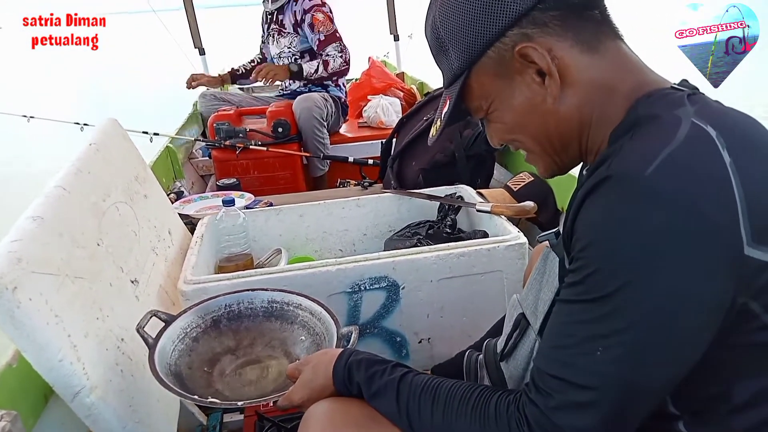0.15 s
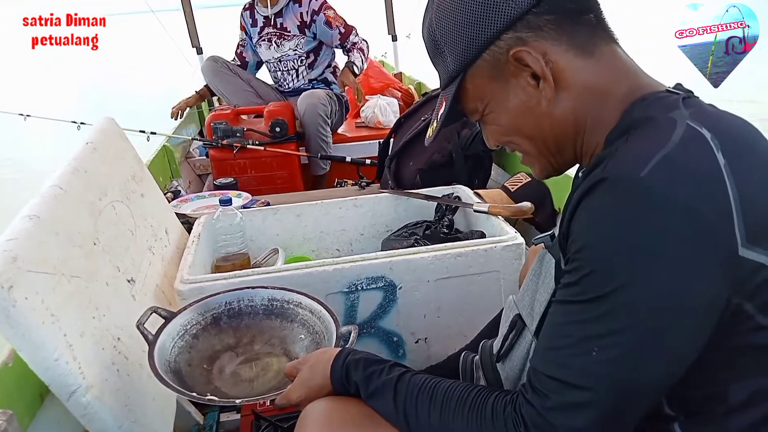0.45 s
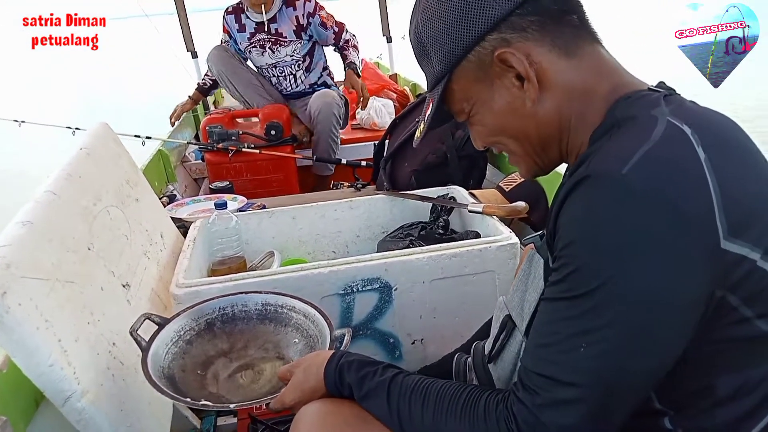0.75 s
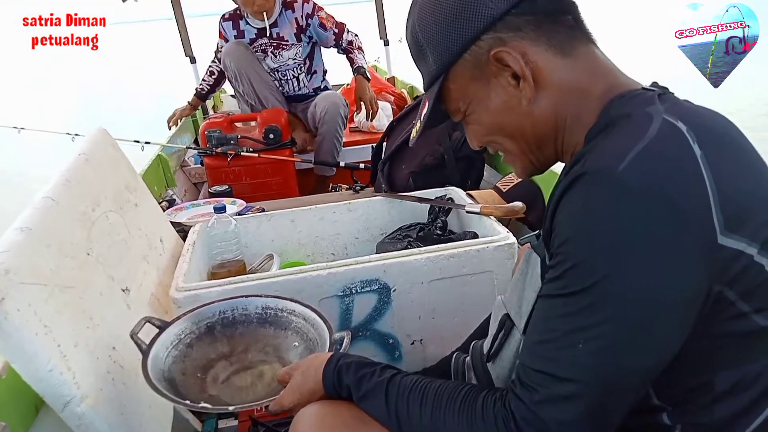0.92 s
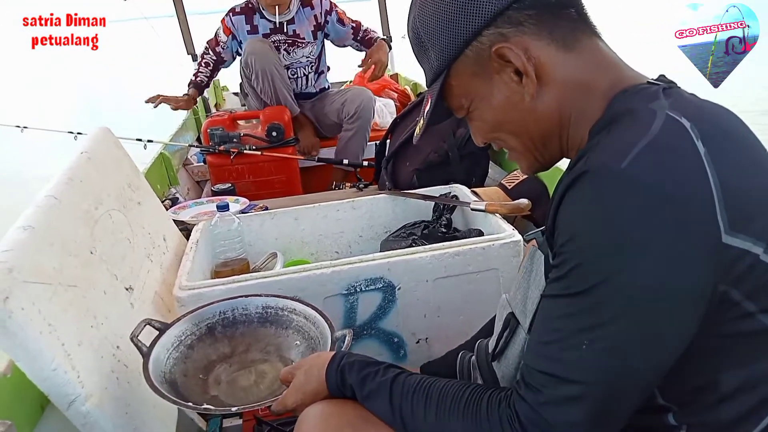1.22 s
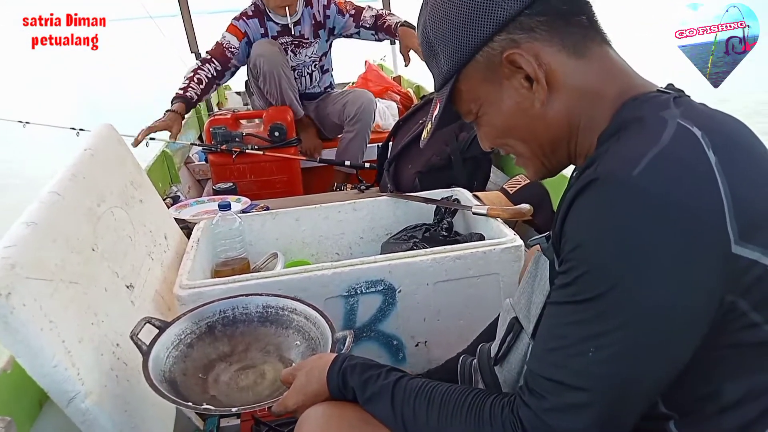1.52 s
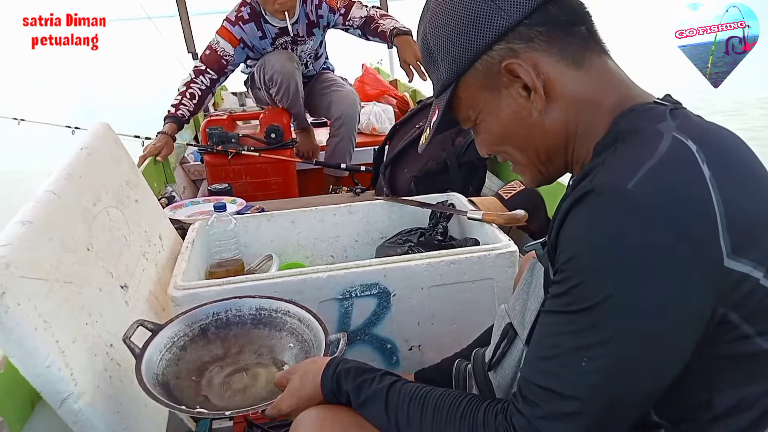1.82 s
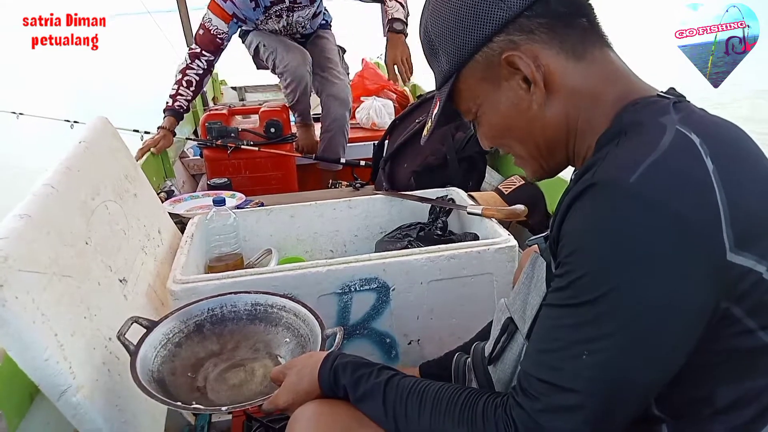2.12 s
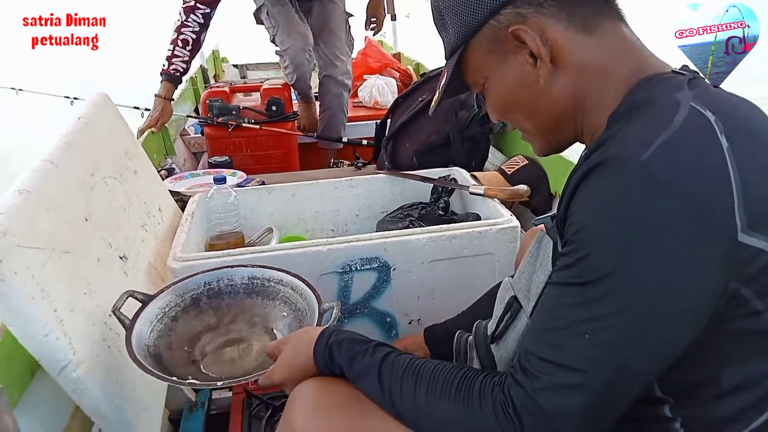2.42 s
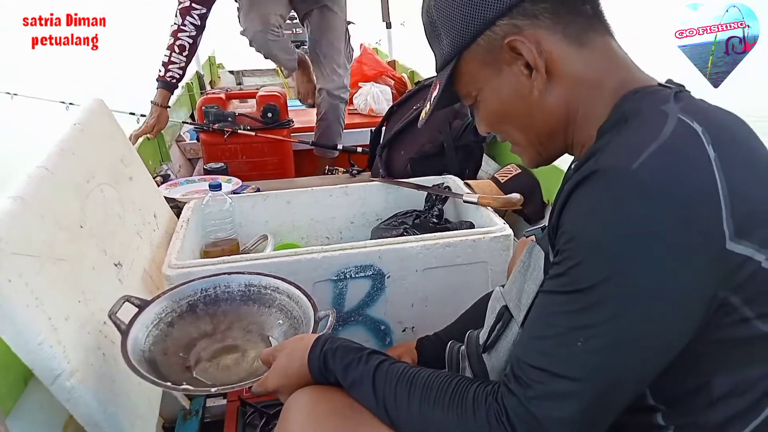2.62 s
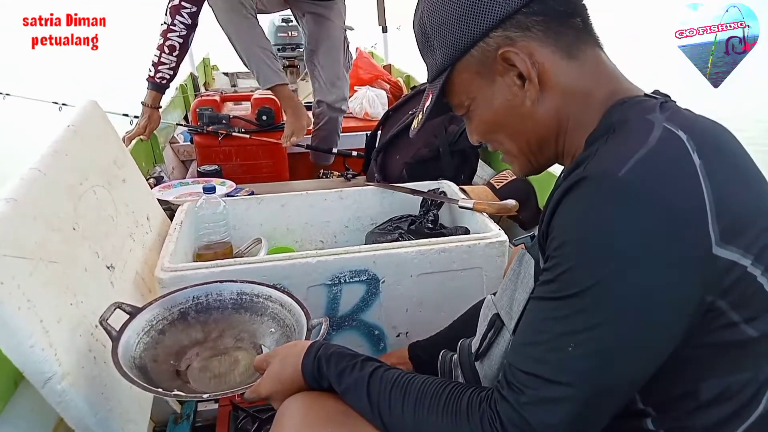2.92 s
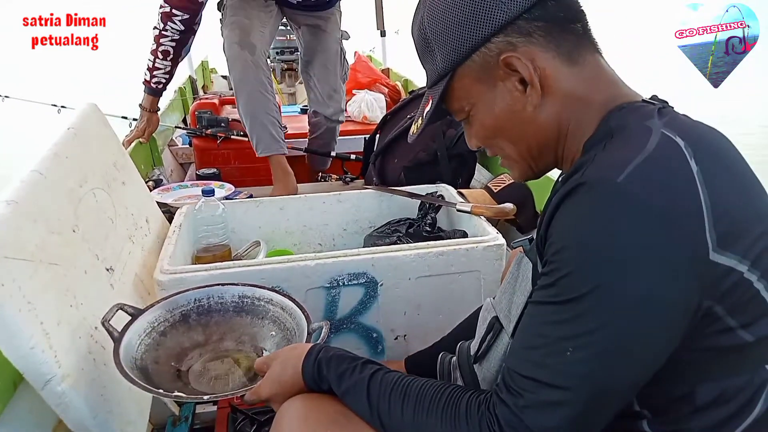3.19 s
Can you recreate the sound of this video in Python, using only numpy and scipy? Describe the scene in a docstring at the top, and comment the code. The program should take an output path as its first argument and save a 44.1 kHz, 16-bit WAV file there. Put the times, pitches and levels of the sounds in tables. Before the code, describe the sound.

Uneven metallic igniter snaps on a camping stove, a quiet gap, then a hard final clack.

```python
"""Sharp snaps of an igniter knob, cranked again and again on a camping gas stove aboard an open boat.
Each snap is a short rattle of sheet metal: enveloped noise plus tiny contacts that ring the stove body.
Decaying sine modes make the thin pan ring a little and the stove thump on the deck.
Behind them a single-cylinder engine putts slowly astern, as pulses through resonances, over sea hiss
of shaped noise and one puff of gas; a small camera microphone colours it all."""
import sys
import numpy as np
from scipy import signal
from scipy.fft import rfft, irfft
from scipy.io import wavfile
from scipy.ndimage import uniform_filter1d

SR = 44100
rng = np.random.default_rng(int(sys.argv[2]) if len(sys.argv) > 2 else 0)


def waveform_to_disk(signal):
    """Save audio, clipped to [-1, 1], as 16-bit WAV at the path in sys.argv[1]."""
    frames = np.transpose(np.atleast_2d(signal))
    scaled = np.clip(frames, -1, 1) * 32767
    samples = np.round(scaled).astype(np.int16)
    wavfile.write(sys.argv[1], SR, samples)


def natural_amplitude(level_db):
    """Convert a level in decibels to a linear amplitude factor, elementwise."""
    exponent = np.asarray(level_db, float) / 20
    return 10 ** exponent


N = 147735  # length [samples]


def unit(x):
    """Scale to rms 1."""
    return x / np.sqrt(np.mean(x ** 2))


def colour(x, table, lo_hz=1, hi_hz=30000):
    """Shape the spectrum of x by (frequency [Hz], level [dB]) points between two soft edges."""
    f = np.arange(N // 2 + 1) * SR / N + 1  # the 1 Hz offset keeps the logarithm finite
    hz, db = np.array(table, float).T
    edges = 1 / np.sqrt((1 + (lo_hz / f) ** 6) * (1 + (f / hi_hz) ** 6))
    gain = natural_amplitude(np.interp(np.log(f), np.log(hz), db))
    return irfft(rfft(x) * gain * edges, N)


def reson(x, hz, width_hz):
    """Two-pole resonance, gain 1 at the centre."""
    return signal.lfilter(*signal.iirpeak(hz, hz / width_hz, fs=SR), x)


def walk(rate):
    """Smooth random drift, rms near 1: levels held for 1 / rate seconds, then slewed twice."""
    k = int(SR / rate)
    held = np.repeat(rng.standard_normal(N // k + 1), k)
    return 1.3 * uniform_filter1d(uniform_filter1d(held, k), k)[:N]


def add(out, s, x):
    """Mix x into out from time s in seconds."""
    i = max(int(s * SR), 0)
    out[i:i + len(x)] += x[:N - i]


def fade(t, t60):
    """Exponential decay by 60 dB in t60 seconds, at least 5 ms."""
    return np.exp(-np.log(1000) * t / max(t60, .005))


def struck(blows, modes, octaves, push_s):
    """Every blow rings the same modes, most those near where it lands, each a little out of tune."""
    out, t = np.zeros(N), np.arange(SR // 2) / SR
    chances = rng.random((len(blows), len(modes), 2))
    for (s, db, near_hz), chance in zip(blows, chances):
        for (hz, mode_db, t60), (phase, tune) in zip(modes, chance):
            nearness = np.exp(-(np.log2(hz / near_hz) / octaves) ** 2)
            tuned_hz = hz * (1 + 0.014 * (tune - .5))
            ring = np.sin(2 * np.pi * tuned_hz * t + 2 * np.pi * phase)
            onset = 1 - np.exp(-t / push_s)
            add(out, s, natural_amplitude(db + mode_db) * nearness * onset * fade(t, t60) * ring)
    return out * natural_amplitude(1.5 * walk(90))  # the ringing wavers in level


# rattles of knob and stove body:
# (time [s], level [dB], low part [dB], treble part [dB], decay t60 of the middle part [s])
RATTLES = [(0.0014, -37.5, 7, -12.5, 0.077), (0.0419, -29.5, -7, -9, 0.14), (0.084, -35.5, -4.5, -12, 0.21),
           (0.0968, -22, 1, -1.5, 0.078), (0.123, -26, -19, -25, 0.19), (0.15, -28.5, 3.5, -19.5, 0.08),
           (0.304, -53, 2, -16, 0.11), (0.488, -36, 0.5, -31.5, 0.13), (0.5287, -41, -5, 1.5, 0.12),
           (0.544, -34.5, -1.5, -10.5, 0.18), (0.556, -30.5, -13, -11, 0.1),
           (0.7374, -49.5, 6.5, -24, 0.25), (0.7808, -37, 1.5, 9, 0.11), (0.9084, -46.5, 1.5, -11.5, 1),
           (0.9716, -20, -2.5, -11, 0.097), (0.977, -18.5, -14, -8.5, 0.099), (1.0918, -38, -4.5, -8, 0.25),
           (1.163, -34.5, 6, 8.5, 0.1), (1.19, -29, -2.5, -26, 0.16), (1.2124, -23, -3.5, -17, 0.14),
           (1.2185, -18.5, -6.5, -10.5, 0.1), (1.271, -36, -3.5, -16, 0.17),
           (1.321, -29.5, -6.5, -10, 0.045), (1.3595, -39, -3.5, -19, 0.086),
           (1.4482, -28.5, -2, -14.5, 0.13), (1.491, -40, 1, 1.5, 0.18), (1.498, -34, -2, -9, 0.18),
           (1.7378, -41, 5, 10.5, 0.12), (1.766, -30, -1.5, -17, 0.15), (1.797, -26.5, -1, -23, 0.16),
           (1.808, -20.5, -2.5, -6.5, 0.088), (1.8774, -50, -6, -31, 0.6), (2.036, -53, -9, -13, 0.72),
           (2.2975, -61, 15.5, -22, 0.091), (2.411, -58.5, 15.5, -29, 0.058), (2.5411, -62, 0, -1, 0.36),
           (2.596, -54, 5, -26.5, 0.22), (2.703, -64, -15, 3, 0.27), (3.025, -42, 3.5, -20, 0.15),
           (3.0303, -31, -7.5, -10, 0.16), (3.0383, -24, -13, -1, 0.12), (3.0485, -33, -8, -23, 0.19),
           (3.275, -42, 0.5, -16, 0.31), (3.3074, -49, 16, -24, 0.14), (3.3179, -5.5, -5.5, -7.5, 0.059),
           (3.3207, -21, 14.5, -26.5, 0.12)]
# tone of the rattle as the microphone hears it, with the microphone's peak near 15 kHz:
# (frequency [Hz], relative level [dB])
RATTLE_TONE = [(150, -9), (250, 10), (788, 1.5), (1280, -3.5), (3170, -11), (5350, -31), (7500, -12),
               (9490, -29.5), (13300, -33.5), (14800, -28)]
# short modes of the stove body: (frequency [Hz], width [Hz], level [dB])
STOVE_MODES = [(653, 39, -12.5), (1050, 190, -5), (1326, 50, -15.5), (1978, 43, -16.5), (2743, 23, -15.5),
               (3203, 170, -8.5), (3486, 140, -10.5)]
LOW_DB, MID_DB, TREBLE_DB = -9, -11, -7.5  # trim of the three parts
LOW_DECAY, TREBLE_DECAY = 1.326, 0.66  # relative to the middle
TAIL_DB, TAIL_T60_S = -30.5, 0.45  # faint tail of fixed decay under each rattle, slower than most
RISE_S, SOFTNESS = .0015, 0.67  # duller contacts rise more slowly
PART_EDGES_HZ = (300, 1500, 5000, 30000)
GRIT_DB, UNEVEN_DB, CONTACTS_PER_S = 2.5, 3.5, 1100


def rattle_power():
    """Power envelopes of the low, middle and treble parts, each with its own decay."""
    t, power = np.arange(SR // 2) / SR, np.zeros((3, N))
    for s, db, low_db, treble_db, t60 in RATTLES:
        rise_s = RISE_S * natural_amplitude(-SOFTNESS * treble_db)
        rise = 1 - np.exp(-t / rise_s)
        parts = ((low_db + LOW_DB, LOW_DECAY), (MID_DB, 1), (treble_db + TREBLE_DB, TREBLE_DECAY))
        for row, (part_db, share) in zip(power, parts):
            tail = natural_amplitude(TAIL_DB) * fade(t, TAIL_T60_S * share)
            shape = fade(t, t60 * share) ** 2 + tail ** 2
            add(row, s - rise_s, (natural_amplitude(db + part_db) * rise) ** 2 * shape)
    return power


def clacks():
    """Sheet metal rattles as gritty noise in three parts; tiny contacts ring the stove modes unevenly."""
    power, out = rattle_power(), np.zeros(N)
    grit = natural_amplitude(GRIT_DB * walk(500))
    for k, row in enumerate(power):
        noise = grit * rng.standard_normal(N)
        out += np.sqrt(row) * unit(colour(noise, RATTLE_TONE, PART_EDGES_HZ[k], PART_EDGES_HZ[k + 1]))
    for hz, width_hz, db in STOVE_MODES:
        contacts = unit((rng.random(N) < CONTACTS_PER_S / SR) * rng.standard_normal(N))
        part = np.searchsorted(PART_EDGES_HZ, hz) - 1
        ring = reson(np.sqrt(power[part]) * contacts, hz, width_hz)
        makeup = np.sqrt(SR / width_hz / np.pi)  # a narrow mode passes little of the contacts
        out += natural_amplitude(db + UNEVEN_DB * walk(18)) * makeup * ring
    return out


# knocks that reach the pan: (time [s], level [dB], frequency around which it is excited [Hz])
PAN_KNOCKS = [(0.099, -52, 1650), (.152, -62.5, 1770), (.781, -46, 3880), (.982, -42.5, 970),
              (1.222, -48, 1310), (1.502, -51, 3300), (1.743, -45.5, 4050), (1.805, -40.5, 2700),
              (1.814, -41.5, 990), (1.892, -64.5, 1650), (3.037, -35.5, 2990), (3.317, -20, 650)]
# modes of the pan: (frequency [Hz], level [dB], decay t60 [s])
PAN_MODES = [(668, 6.5, 0.14), (895, 8, 0.18), (1200, -1, 0.14), (1665, 8.5, 0.39), (2010, -10, 0.087),
             (2450, -4, 0.21), (2680, -8.5, 0.14), (2950, 4, 0.1), (3300, 2, 0.096), (3850, 5.5, 0.1),
             (4130, 3, 0.096)]


def pan():
    """Thin metal rings in its own modes when a knock reaches it."""
    return struck(PAN_KNOCKS, PAN_MODES, octaves=0.37, push_s=RISE_S)


# stove thumping on the deck: (time [s], level [dB], frequency around which it is excited [Hz])
DECK_THUMPS = [(0.009, -31, 97), (0.096, -21.5, 193), (0.123, -22, 272), (0.164, -28.5, 153),
               (0.557, -29, 245), (0.582, -28, 160), (0.782, -29.5, 135), (0.939, -28, 162),
               (0.98, -26, 247), (1.089, -42, 90), (1.157, -24.5, 152), (1.217, -21.5, 210),
               (1.249, -28, 145), (1.314, -28, 171), (1.391, -36.5, 150), (1.461, -30.5, 165),
               (1.517, -26.5, 213), (1.738, -25.5, 154), (1.764, -23, 118), (1.81, -23, 213),
               (3.303, -21.5, 140), (3.315, -9, 257), (3.333, -21, 185)]
# modes of the deck boards: (frequency [Hz], level [dB], decay t60 [s])
DECK_MODES = [(88.2, -7, 0.26), (124.8, -4, 0.088), (152, -9, 0.2), (179.6, -9.5, 0.15), (245, -7, 0.097),
              (280.5, -13, 0.15)]


def deck():
    """The stove pushes softly on the boards, which answer in low modes."""
    return struck(DECK_THUMPS, DECK_MODES, octaves=0.58, push_s=0.0049)


FIRST_FIRING_S, FIRING_HZ, ENGINE_DB = .0235, 13.19, -61.5
EXHAUST_HZ, EXHAUST_WIDTH_HZ = 145, 55  # width of each of two passes
HULL_HZ, HULL_WIDTH_HZ, HULL_DB = 105.8, 12, -6.5


def engine():
    """Nearly even firings pulse a short exhaust resonance, which drives a longer one of the hull."""
    times = np.arange(FIRST_FIRING_S, N / SR, 1 / FIRING_HZ)
    chance, pulses = rng.standard_normal((len(times), 2)), np.zeros(N)
    times = times + .0008 * chance[:, 0]
    pulses[np.clip((times * SR).astype(int), 0, N - 1)] = -natural_amplitude(1.5 * chance[:, 1])
    puff = reson(reson(pulses, EXHAUST_HZ, EXHAUST_WIDTH_HZ), EXHAUST_HZ, EXHAUST_WIDTH_HZ)
    hull = reson(puff, HULL_HZ, HULL_WIDTH_HZ)
    return natural_amplitude(ENGINE_DB) * (unit(puff) + natural_amplitude(HULL_DB) * unit(hull))


# a puff of escaping gas: (time [s], level [dB])
GAS_PUFF = [(1.98, -83), (2.04, -76), (2.13, -75), (2.22, -96)]
GAS_HZ, GAS_WIDTH_HZ = 7260, 3000  # width of each of two passes


def gas():
    """Escaping gas is a thin fluttering hiss: noise through a broad treble resonance."""
    s, db = np.array(GAS_PUFF).T
    jet = reson(reson(rng.standard_normal(N), GAS_HZ, GAS_WIDTH_HZ), GAS_HZ, GAS_WIDTH_HZ)
    level_db = np.interp(np.arange(N) / SR, s, db, left=-110, right=-110)
    return natural_amplitude(level_db + 3.4 * walk(70)) * unit(jet)


# tone of the sea: (frequency [Hz], relative level [dB])
SEA_TONE = [(30, -44), (60, 5.5), (130, 8), (280, -1.5), (1100, -13), (3220, -16), (4000, -21.5),
            (5170, -41), (7470, -25), (9460, -36), (14800, -34.5), (16000, -61)]
SEA_DB = -61.5


def sea():
    """Sea hiss is shaped noise that swells slowly and flickers a little faster."""
    swell_db = 0.5 * walk(1.31) + 1.3 * walk(25.3)
    return natural_amplitude(SEA_DB + swell_db) * unit(colour(rng.standard_normal(N), SEA_TONE))


def scene():
    """All sources, one channel."""
    return (clacks() + pan() + deck() + engine() + gas() + sea())[None]


def roll_off(x):
    """The treble ends steeply here."""
    return signal.sosfilt(signal.butter(12, 16520, fs=SR, output="sos"), x)


def record(dry):
    """The camera cuts the deep bass below 65 Hz and the top above 15.6 kHz."""
    bass_cut = signal.butter(2, 65, "high", fs=SR, output="sos")
    top_cut = signal.ellip(8, .2, 60, 15600, fs=SR, output="sos")
    mix = signal.sosfilt(top_cut, signal.sosfilt(bass_cut, dry))
    return roll_off(mix)


dry = scene()
out = record(dry)
waveform_to_disk(out)
```